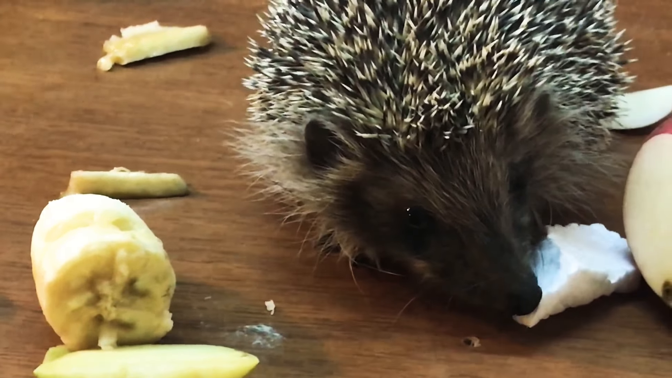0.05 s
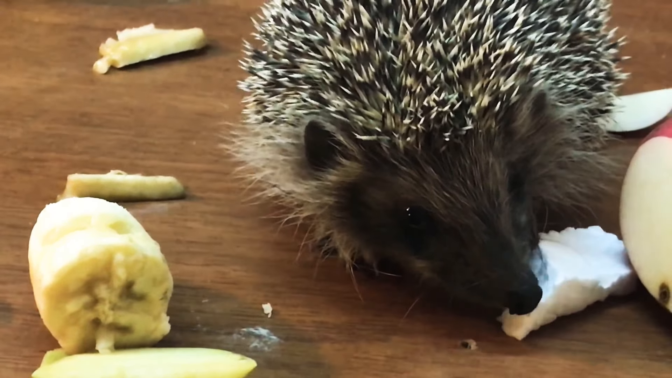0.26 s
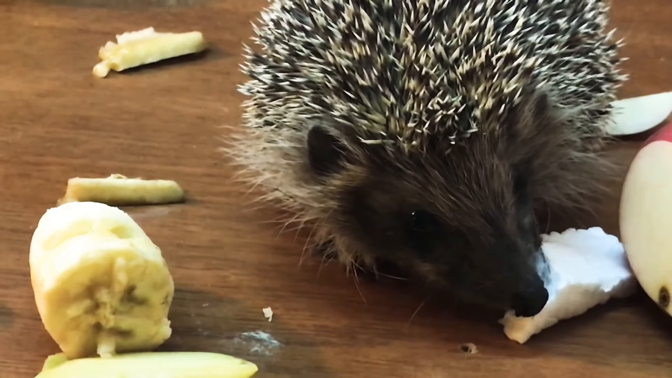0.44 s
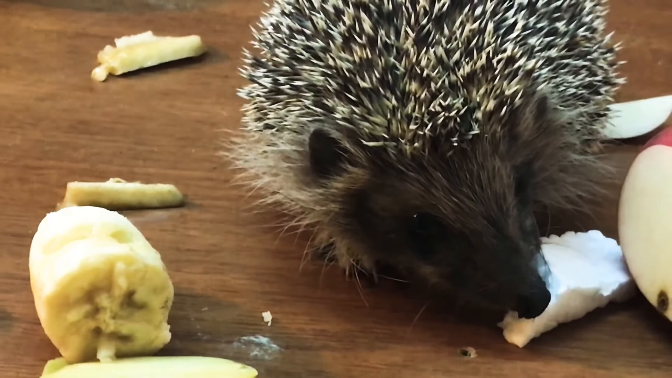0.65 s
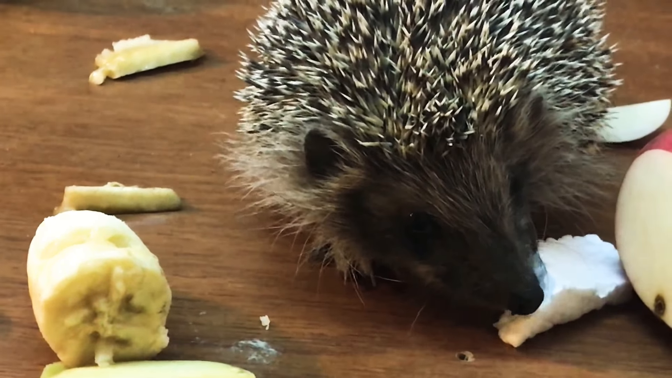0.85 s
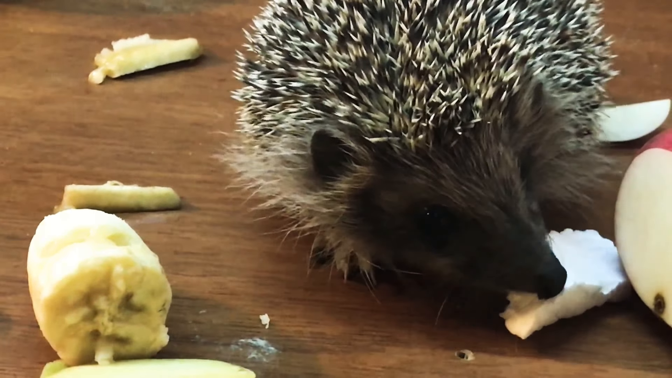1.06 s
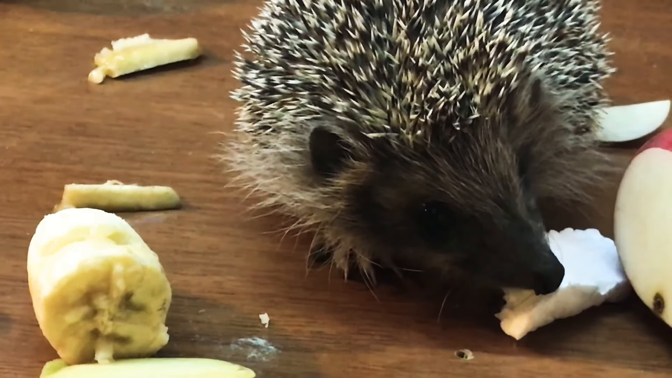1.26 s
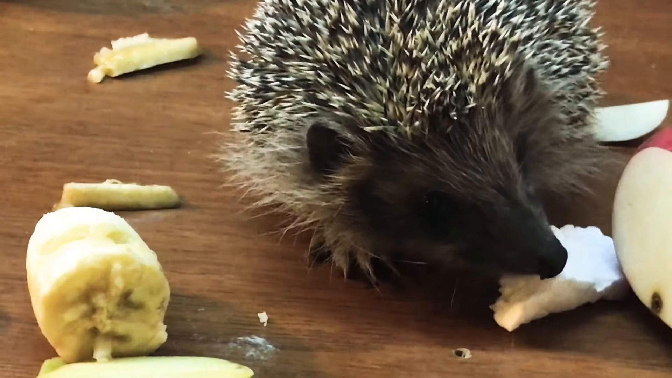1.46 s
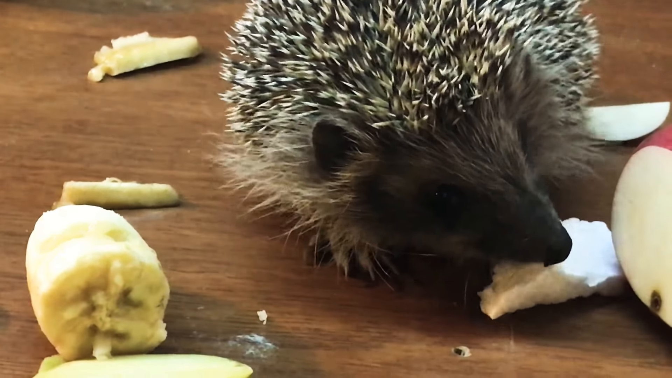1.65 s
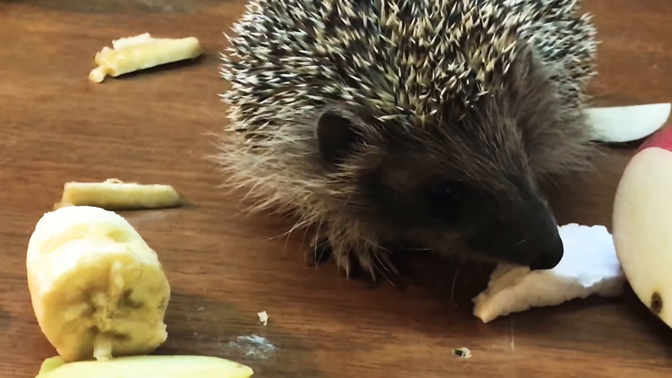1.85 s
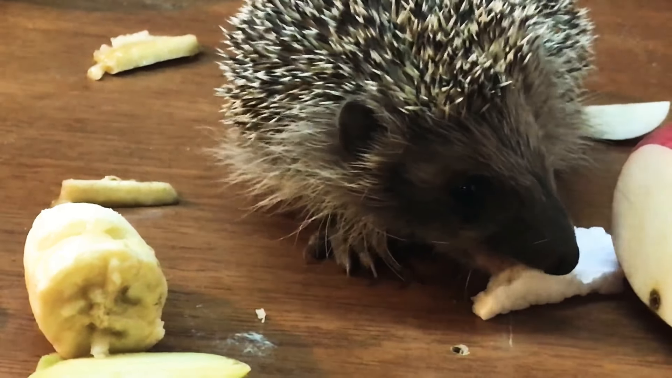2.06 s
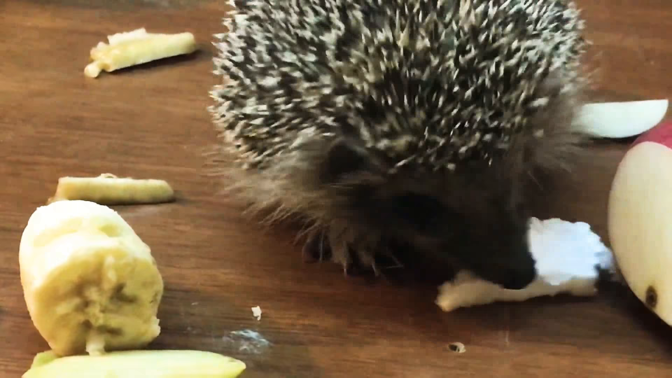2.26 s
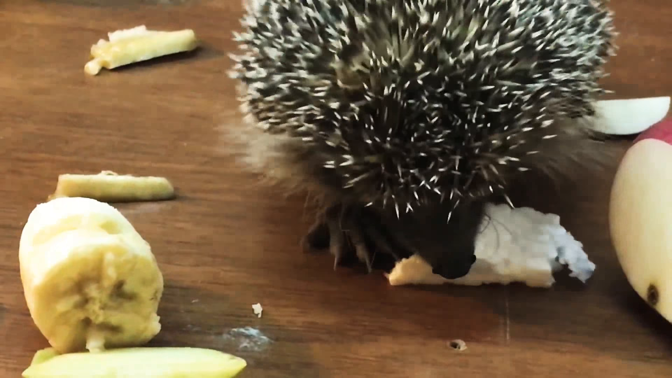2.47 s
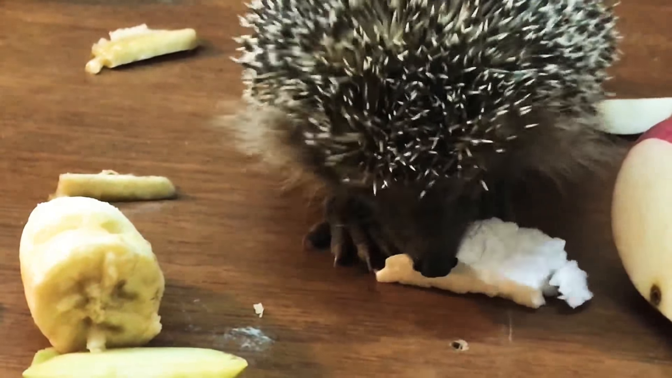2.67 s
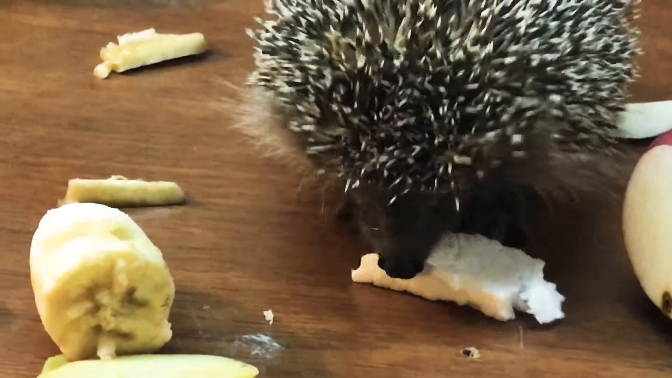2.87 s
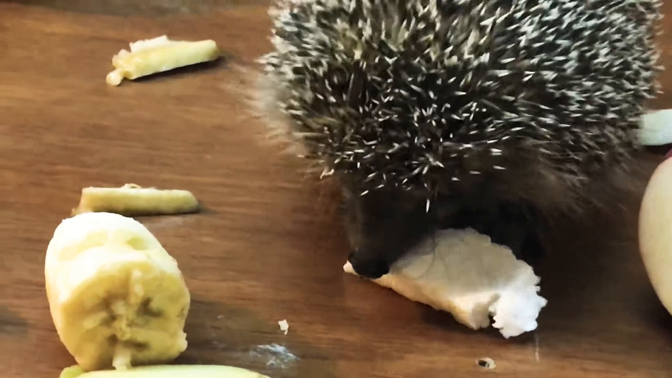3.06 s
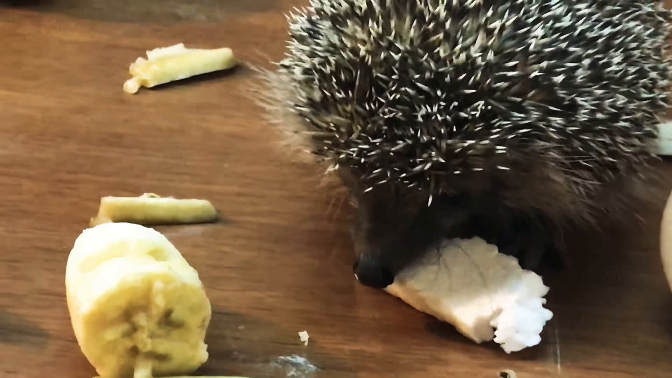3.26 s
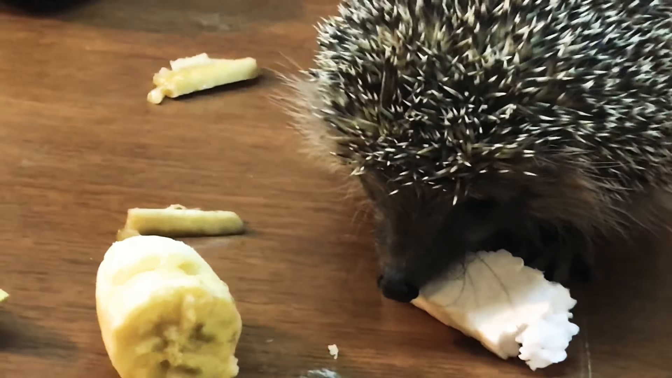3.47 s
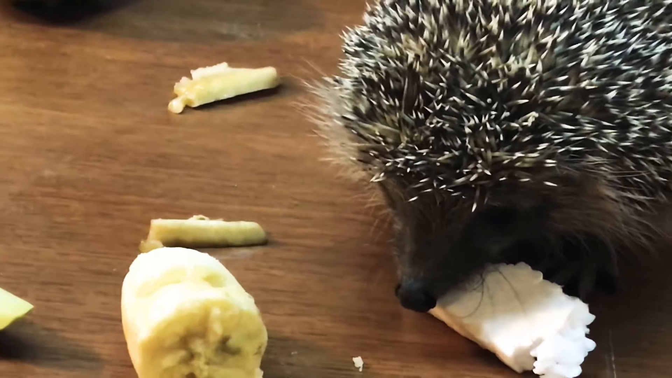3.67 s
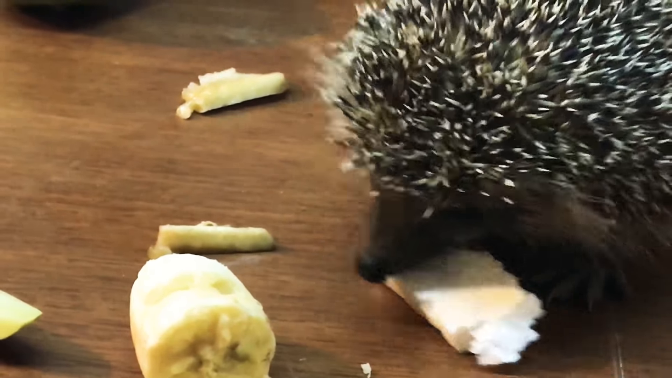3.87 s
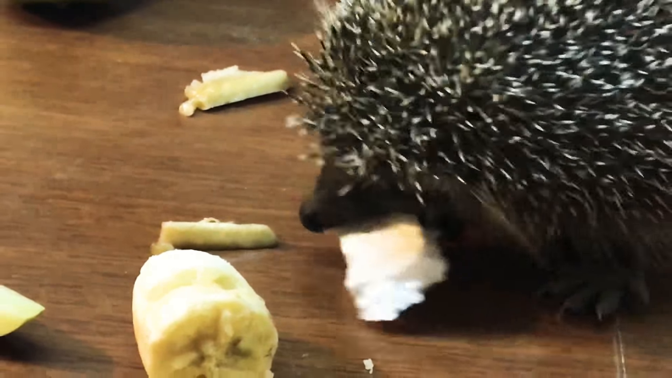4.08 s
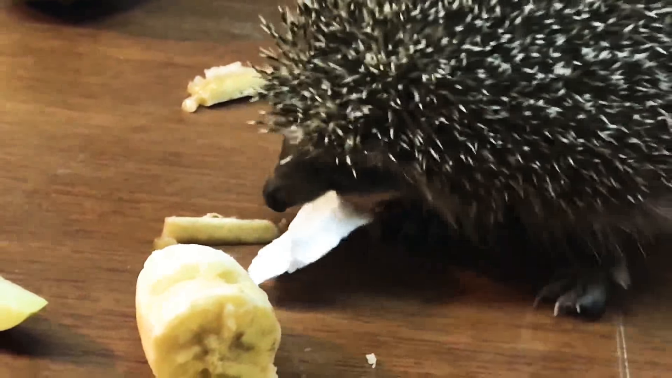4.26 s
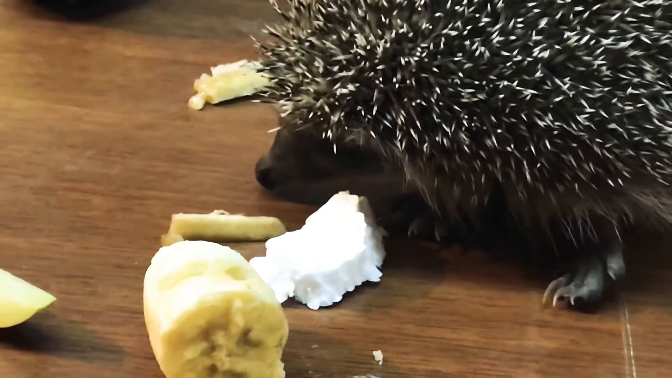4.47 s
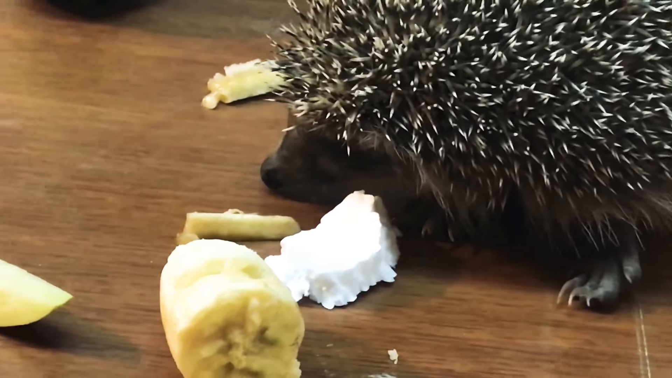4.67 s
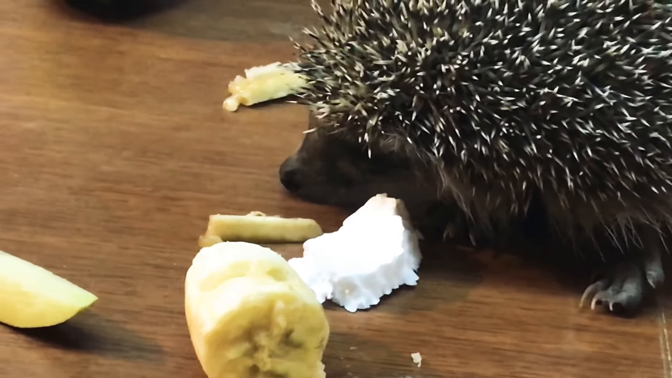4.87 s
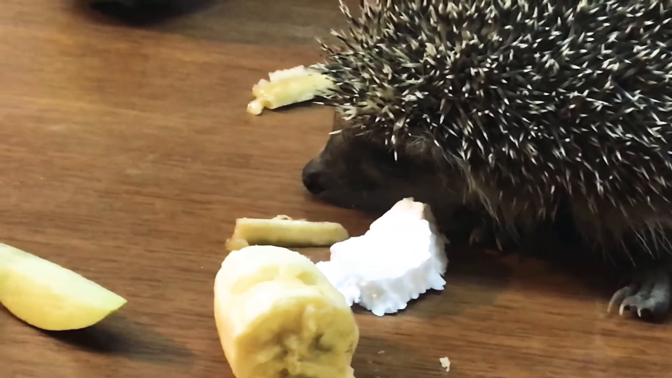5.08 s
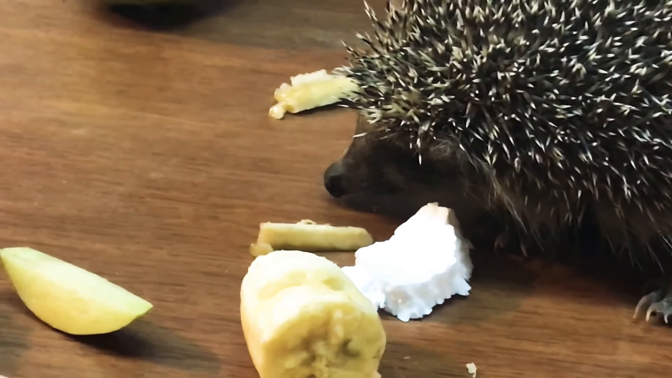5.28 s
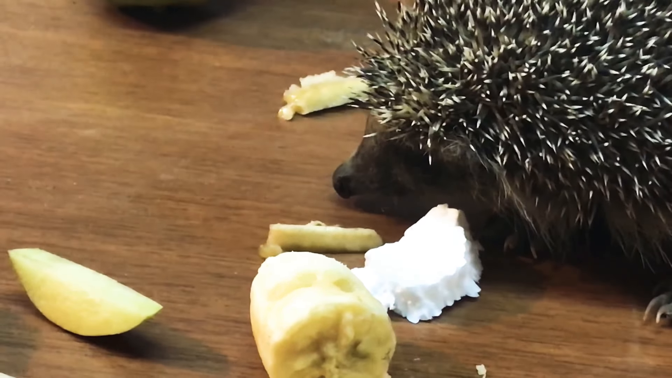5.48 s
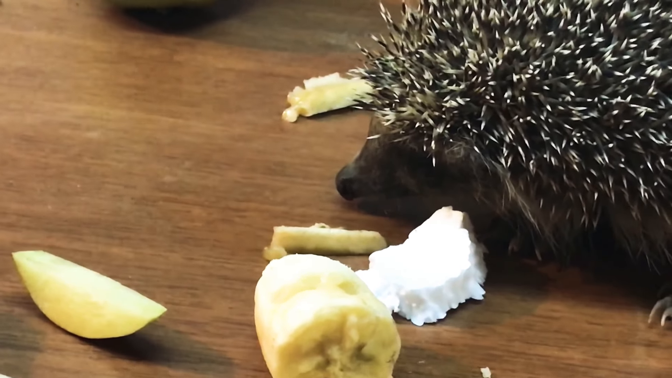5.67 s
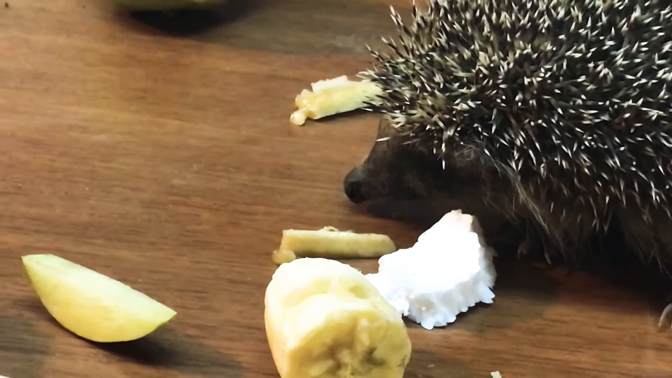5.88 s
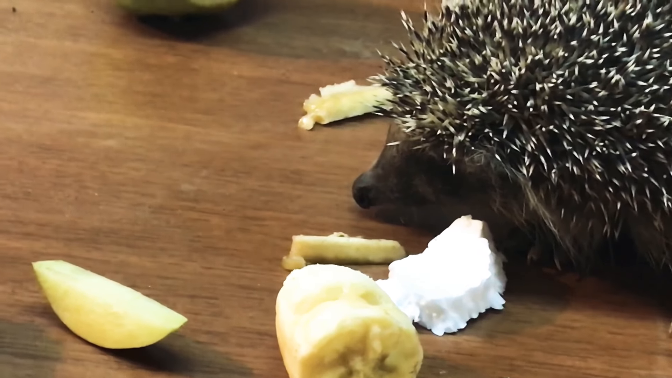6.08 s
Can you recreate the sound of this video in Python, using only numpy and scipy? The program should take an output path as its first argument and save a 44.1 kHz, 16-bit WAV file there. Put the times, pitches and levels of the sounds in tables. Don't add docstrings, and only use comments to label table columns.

```python
import sys
import numpy as np
from scipy import signal
from scipy.fft import rfft, irfft, next_fast_len
from scipy.io import wavfile
from scipy.ndimage import uniform_filter1d

SR = 44100
rng = np.random.default_rng(int(sys.argv[2]) if len(sys.argv) > 2 else 0)


def attenuation_scalar(level_db):
    decades = np.asarray(level_db, float) / 20
    return 10 ** decades


def to_wav(s):
    ch = np.atleast_2d(s).T
    pcm = np.round(np.clip(ch, -1, 1) * 32767)
    wavfile.write(sys.argv[1], SR, pcm.astype(np.int16))


N = 270333


def causal(hz, db):
    size = 8192
    f = np.maximum(np.arange(size // 2 + 1) * SR / size, 1)
    log_gain = np.interp(np.log(f), np.log(hz), db) * np.log(10) / 20
    cepstrum = irfft(log_gain)
    cepstrum[1:size // 2] *= 2
    cepstrum[size // 2 + 1:] = 0
    return irfft(np.exp(rfft(cepstrum)))


def shaped(x, hz, db):
    return signal.fftconvolve(x, causal(hz, db))[:N]


def walk(rate_hz):
    hold = int(SR / rate_hz)
    steps = np.repeat(rng.standard_normal(N // hold + 1), hold)
    return 1.3 * uniform_filter1d(uniform_filter1d(steps, hold), hold)[:N]


def bump(s, rise_ms, hold_ms, fall_ms):
    rise, hold, fall = np.maximum([rise_ms, hold_ms, fall_ms], 0.1) * SR / 1000
    first = max(int(s * SR - 6 * rise), 0)
    last = min(int(s * SR + hold + 6 * fall), N)
    i = np.arange(first, last)
    u = i - s * SR
    return i, np.exp(np.where(u < 0, u / rise, -np.maximum(u - hold, 0) / fall))


# hz, density_db_per_hz
ROOM_COLOUR = [(22, -27), (38, -5.5), (76, -10), (242, -14.5), (588, -21), (1000, -23.5), (4900, -32),
               (10000, -35), (14000, -35.5)]


def room():
    hiss = shaped(rng.standard_normal(N), *np.transpose(ROOM_COLOUR))
    low = signal.sosfilt(signal.butter(2, 400, fs=SR, output="sos"), hiss)
    drifting = hiss * attenuation_scalar(0.18 * walk(1.2)) + low * (attenuation_scalar(1.7 * walk(11)) - 1)
    return drifting * attenuation_scalar(-66.5) / np.std(hiss)


# time_s, level_db
FRIDGE_LEVEL = [
    (0.0, -60),
    (0.44, -56.5),
    (3.84, -56),
    (4.71, -58.5),
    (5.46, -53.5),
    (5.62, -59),
    (6.13, -55),
]


def fridge():
    t = np.arange(N) / SR
    turn = 2 * np.pi * 49.5 * t
    level = np.sqrt(2) * attenuation_scalar(np.interp(t, *np.transpose(FRIDGE_LEVEL)))
    return level * (np.sin(turn) + attenuation_scalar(-22.5) * np.sin(2 * turn))


# first_stroke_s, last_stroke_s
CRICKET_TRILLS = [(.007, 0.034), (0.08, .128), (.162, .228), (.277, .33), (.38, .398), (.511, .565),
                  (.657, .696), (0.759, .86), (.875, .927), (1.062, 1.13), (1.207, 1.26), (1.294, 1.426),
                  (1.477, 1.6), (1.795, 1.88), (1.908, 2.011), (3.428, 3.46), (3.51, 3.56), (3.695, 3.746),
                  (4.578, 4.665), (4.695, 4.797), (4.964, 5.046), (5.327, 5.412), (5.665, 5.697),
                  (5.728, 5.763), (5.843, 5.86), (5.897, 5.929), (6.044, 6.113)]


def cricket():
    stroke_s, stroke_db, chorus_db = 0.0172, -67.5, -85.0
    env = np.full(N, attenuation_scalar(chorus_db))
    for first_s, last_s in CRICKET_TRILLS:
        count = round((last_s - first_s) / stroke_s) + 1
        for s in np.linspace(first_s, last_s, num=count):
            i, stroke = bump(s - 0.002, 1.5, 1.5, 1.8)
            env[i] += attenuation_scalar(stroke_db) * stroke
    rasp = shaped(rng.standard_normal(N), [10970, 14100, 14790, 16140], [-39.0, -19.5, 1.5, -4.0])
    return env * attenuation_scalar(1.5 * walk(50)) * rasp / np.std(shaped(rasp, *np.transpose(MIC_PORT)))


POSTURE_CHANGE = [
    2.13,
    3.86,
]


def posture_now():
    return np.searchsorted(POSTURE_CHANGE, np.arange(N) / SR)


BOARD_RUMBLE = [
    -68,
    -53.5,
    -56.5,
]
# start_s, level_db, rise_ms, hold_ms, fall_ms
WEIGHT_SHIFTS = [
    (2.6, -69.5, 30, 98, 41),
    (4.74, -70, 22, 130, 60),
]


def board():
    load_ms = 70
    load = np.maximum(uniform_filter1d(sum(slips()), int(load_ms * SR / 1000)), 0)
    env = attenuation_scalar(np.array(BOARD_RUMBLE)[posture_now()]) * load ** 0.19
    for s, db, rise_ms, hold_ms, fall_ms in WEIGHT_SHIFTS:
        i, shift = bump(s, rise_ms, hold_ms, fall_ms)
        env[i] += attenuation_scalar(db) * shift
    rumble = shaped(rng.standard_normal(N), [80, 180, 350, 700, 1100], [-17.5, -5.0, -5.0, -7.5, -29.5])
    return env * attenuation_scalar(2.9 * walk(40)) * rumble / np.std(rumble)


# start_s, peak_db, pitch_hz, t60_s
PAW_STEPS = [(1.87, -54, 2500, 0.018), (1.87, -47, 4900, 0.0077), (1.87, -57, 6200, .007),
             (3.072, -53, 570, 0.044), (3.083, -51, 430, 0.05), (3.166, -48.5, 614, 0.026),
             (3.166, -38, 240, 0.018), (3.186, -47, 280, 0.034), (4.305, -52.5, 306, 0.054),
             (4.302, -54, 665, 0.032), (4.296, -53, 1440, .025), (4.298, -43.5, 2720, .018),
             (3.1, -47, 1800, .02), (2.98, -26.5, 4000, 0.0066), (2.253, -47, 660, .04),
             (2.244, -34.5, 2110, .024), (4.728, -50, 213, 0.2), (4.765, -53, 124, 0.32),
             (4.828, -50.5, 213, 0.15), (4.875, -53, 260, .06)]


def paws():
    push_cycles = 1.38
    out, t = np.zeros(N + SR), np.arange(SR // 4) / SR
    for s, db, hz, t60_s in PAW_STEPS:
        push = 1 - np.exp(-t * hz / push_cycles)
        decay = np.exp(-np.log(1000) * t / t60_s)
        start = int(s * SR)
        out[start:start + len(t)] += attenuation_scalar(db) * np.sin(2 * np.pi * hz * t) * decay * push
    return out[:N] * attenuation_scalar(3.47 * walk(200))


# start_s, peak_db, from_hz, to_hz, length_ms
BEND_CREAKS = [
    (2.187, -42, 1150, 1480, 14.8),
    (2.206, -43, 1250, 1620, 8.2),
    (2.208, -41, 2600, 3250, 13),
    (2.211, -48, 3700, 4700, 11),
]


def creaks():
    out = np.zeros(N)
    for s, db, from_hz, to_hz, ms in BEND_CREAKS:
        bend = np.linspace(0, 1, num=int(ms * SR / 1000)) ** 1.62
        hz = from_hz + (to_hz - from_hz) * bend
        tone = np.sqrt(np.hanning(len(hz))) * np.sin(2 * np.pi * np.cumsum(hz) / SR)
        start = int(s * SR)
        out[start:start + len(hz)] += attenuation_scalar(db) * tone
    return out * attenuation_scalar(1.4 * walk(400))


# start_s, level_db, length_ms, fine_crackle_db
WALL_TICKS = [(.062, -53.5, 1.1, -13), (.079, -64, 1.9, 1), (.129, -62, 2.4, -4), (.551, -57, 1.9, -2),
              (.622, -43, 1.6, -4), (1.043, -52.5, 0.92, -2), (1.352, -57, 1.7, 6), (1.498, -56.5, 3, 1),
              (1.747, -48, 1.3, 11), (1.805, -50, 0.82, 10), (1.835, -50, 0.79, 12), (2.569, -39, 1.1, -3),
              (2.401, -30, .8, -8), (2.558, -48, 1, -8), (2.629, -39.5, 1.1, -4), (2.657, -37, 1.2, -2),
              (2.833, -35.5, 1.1, -9), (2.853, -40, 1.2, -1), (2.931, -44, 1, -3), (2.947, -41, .8, 0),
              (2.973, -42, 1.5, 4.5), (3.067, -31, 1.8, 6.5), (3.291, -47, 2, -4), (3.596, -56, 1, -2),
              (3.603, -57, 1.2, 2), (3.611, -53, 1, -2), (3.618, -46, 0.96, 0), (3.691, -59.5, 1, 5),
              (3.708, -55, 1.1, -9), (3.719, -65.5, 1, 6), (3.79, -50, 1.2, 0), (3.845, -50, 1.2, -4),
              (3.853, -61, 1.5, -4), (4.239, -40, 1, 3), (3.481, -46.5, 1.8, -4), (.26, -43, 1.9, -5),
              (.535, -47, 1, -3), (2.112, -50, 1.1, -4), (3.5535, -47.5, 1.5, -2), (3.663, -43.5, 1, 0),
              (2.7855, -31.5, 1.02, 0), (3.748, -57, 1.5, 1), (3.758, -51.5, 1.2, -4),
              (4.518, -62, 1.6, -0.5), (4.692, -76, 1, 3), (4.705, -67, 2.7, -9.5), (5.249, -58.5, 1.2, 5),
              (5.583, -63.5, .9, 8), (5.772, -62, 1.8, -2)]
JAW_CLAMPS = [(2.168, -37, 1.2, -7), (2.571, -51, 9, 1), (3.46, -47.5, 0.86, -10), (2.188, -38.5, 10.4, -5),
              (2.208, -32, 10, -4), (2.242, -26.5, 4.9, -6), (2.2515, -28.5, 3.9, -4.5),
              (2.412, -32, 56, 0.5), (2.602, -38.5, 12, -2), (2.672, -41.5, 11, -4), (2.709, -39.5, 12, -5),
              (2.7225, -35.5, 3.5, -1), (2.763, -48, 7.2, 6), (2.852, -46, 32, -5), (3.571, -52, 5, 1),
              (.247, -52.5, 17, -10), (3.822, -59.5, 33, -1)]
FREE_JERKS = [(1.7, -54, 2, -9), (1.878, -60, 2, -2), (2.094, -54, 1, 0), (2.129, -51.5, 1, 2),
              (2.219, -31.5, 0.72, -4), (3, -39, 6, -2), (3.44, -66, 1, -8), (3.943, -34, 1, -4),
              (4.108, -45, 1, -9), (0.161, -65.5, 50, -19), (.338, -59, 15, -7), (0.46, -55, 35, -6),
              (1.362, -63, 8, -5), (1.5, -62, 17, -8), (1.808, -61, 30, 0), (1.3, -63, 3.2, -8),
              (1.912, -55, 8, -7), (2.137, -57.5, 85, -5), (2.242, -46, 230, -6), (2.269, -40, 10, -1),
              (2.997, -40, 8.2, 0), (4.241, -46, 13, 4), (3.611, -71, 37, 4), (3.684, -58, 2.5, -1),
              (3.905, -60, 49, 2), (3.468, -45, 2.1, -9), (3, -44, 2, -4), (3.578, -48, 1.5, -7),
              (1.275, -57, 2, 3), (2.5, -61, 1.5, 9), (.147, -62, 2, -8), (4.333, -45, 16, -4)]
PRESSURE_SWELLS = [(.535, -61, 8.4, -3), (.731, -66, 16, -16), (1.209, -61, 12, -8), (1.285, -68, 6, -2),
                   (1.45, -55, 7.3, -8), (1.536, -59, 11, -2), (1.62, -62.5, 36, -2), (1.723, -59, 7.9, -6),
                   (1.745, -63.5, 86, -4), (1.86, -60, 10, -2), (2.043, -56.5, 15, 0.5),
                   (2.125, -59.5, 48, -6), (2.177, -46, 23, -1), (2.22, -32, 3.7, -4), (2.468, -32, 20, 1),
                   (2.507, -47, 11, 5), (2.601, -43, 2.96, 0), (2.746, -46, 19, -3.5), (2.788, -39, 14, -3),
                   (2.806, -42.5, 45, -5), (2.832, -45, 6.9, 1), (2.956, -46, 61, -3),
                   (2.98, -42.5, 16, -9.5), (3.048, -43, 28, 0), (3.09, -54, 41, -1), (3.368, -59, 40, -6),
                   (3.639, -46, 9.1, -7), (3.651, -48, 4.8, -10), (4.238, -39, 26, -10)]
TOOTH_BITES = [(.326, -59, 3.5, 0), (.36, -61, 2.5, -11), (.855, -79, 4, -7), (.979, -57.5, 43, -3),
               (1.156, -55.5, 4.2, -6), (1.97, -68, 12, -1), (2.074, -58.5, 0.7, -5),
               (2.234, -40.5, 3, -2.5), (2.735, -48, 9.7, -5), (2.906, -47, 17, -4), (3.293, -58, 8.5, -7),
               (3.305, -50, 14.3, -9), (3.476, -57, 9.3, -9), (3.985, -41, 42, -7), (4.035, -41.5, 129, -8),
               (4.2, -45.5, 34, 6), (4.298, -39.5, 4.4, -5), (4.372, -67, 2, 3), (4.933, -73, 8.3, -5)]
BOARD_RUBS = [(3.0797, -28.5, .8, -3), (4.046, -40, 4, -4), (4.002, -38, 6, -5), (.292, -65, 18, -4),
              (.619, -66, 16, -2), (.655, -65, 9.2, 0), (.991, -50, 4.6, -8.5), (1.125, -58.5, 32, -5.5),
              (1.299, -71, 8, -2), (2.4, -35, 60, -1), (2.435, -25.5, 4.4, -1), (2.514, -34, 5, -6),
              (2.843, -46.5, 5.5, -2), (3.126, -43, 9.7, -4.5), (3.235, -46, 6.1, -5),
              (2.641, -41.5, 17, -2.5), (2.866, -40.5, 12.5, -6), (2.804, -47, 4, -6), (4.42, -58, 3.1, 2),
              (3.006, -36.5, 26.5, -4), (3.176, -51.5, 12, -5), (3.78, -53.5, 10, -5),
              (3.962, -36.5, 51, -1.5), (4.135, -37.5, 46, -3.5), (4.321, -45, 7.1, -6.5),
              (4.415, -48, 22, -1.5), (4.5, -64, 28, 1), (4.578, -73, 6.9, -6)]


def slips():
    kinds = [
        (WALL_TICKS, lambda ms: (0.24, 0, ms)),
        (JAW_CLAMPS, lambda ms: (0.93, ms, 3.2)),
        (FREE_JERKS, lambda ms: (0.93, 0, ms)),
        (PRESSURE_SWELLS, lambda ms: (ms, 0.12 * ms, 0.93 + 0.091 * ms)),
        (TOOTH_BITES, lambda ms: (4.2, ms, 0.93 + 0.41 * ms)),
        (BOARD_RUBS, lambda ms: (ms, 0.47 * ms, ms)),
    ]
    shell, fine = np.zeros(N), np.zeros(N)
    for rows, shape_ms in kinds:
        for s, db, ms, fine_db in rows:
            i, env = bump(s, *shape_ms(ms))
            power = (env * attenuation_scalar(db)) ** 2 / (1 + attenuation_scalar(fine_db) ** 2)
            shell[i] += power
            fine[i] += power * attenuation_scalar(fine_db) ** 2
    return shell, fine


# time_s, pressure_db
BOARD_PRESSURE = [(.3, -8), (1.0, 3), (1.3, -8.5), (2.2, 2.5), (2.36, 12.5), (2.47, 7), (2.66, 7),
                  (2.721, -7.5), (2.87, -1), (3.02, 17), (3.12, 0), (3.3, -1), (3.8, 4), (3.93, -6.5),
                  (4.2, -3), (4.3, 10), (4.37, 5), (4.55, 10)]
# faint rubbing between slips, level_db
REST_RUB = [
    -79,
    -77,
    -110,
]
# table-contact ring, level_db
CONTACT_RING = [
    -20,
    -17,
    -21,
]
# body ring, level_db
BODY_RING = [
    -12,
    -14.5,
    -16.5,
]
# upper over lower shell, ratio_db
UPPER_SHELL = [
    -11,
    -0.5,
    -5.5,
]


def force():
    posture = posture_now()
    rest = attenuation_scalar(np.array(REST_RUB)[posture] + 3.7 * walk(30))
    shell, fine = slips()
    shell = shell + rest ** 2
    fine = fine + (attenuation_scalar(-6.0) * rest) ** 2
    total = np.sqrt(shell + fine)
    press_db = np.interp(np.arange(N) / SR, *np.transpose(BOARD_PRESSURE))
    ring = total * attenuation_scalar(np.array(CONTACT_RING)[posture] + 0.076 * press_db)
    body = total * attenuation_scalar(np.array(BODY_RING)[posture] + 0.42 * press_db)
    upper = attenuation_scalar(np.array(UPPER_SHELL)[posture] - 0.28 * press_db)
    lower = np.sqrt(shell / (1 + upper ** 2))
    return ring, body, lower, lower * upper, np.sqrt(fine)


def cracks(per_second, spread_db):
    hit = rng.random(N) < per_second / SR
    size_db = spread_db * np.minimum(rng.exponential(size=N), 3)
    x = hit * rng.standard_normal(N) * attenuation_scalar(size_db)
    return x / np.std(x)


def face_response(colour, rings):
    grain_db = 1.8
    hz = np.geomspace(200, 20000, num=500)
    colour_hz, colour_db = np.transpose(colour)
    db = np.interp(np.log(hz), np.log(colour_hz), colour_db)
    db = db + grain_db * np.minimum(hz / 4500, 1) * rng.standard_normal(len(hz))
    for ring_hz, width_hz, ring_db in rings:
        db = db + ring_db / (1 + (2 * (hz - ring_hz) / width_hz) ** 2)
    return causal(hz, db)


FACE_FLIPS = [
    2.13,
    3.1,
]
# hz, density_db_per_hz
NIBBLE_FACE = [(410, -73), (700, -7), (2580, -18.5), (3910, -15.5), (4180, -10), (4700, -18), (6020, -5.5),
               (7510, -15), (8670, -4), (11900, -9), (15800, -9)]
TURN_FACE = [(500, -56), (850, -15.5), (2400, -15.5), (2620, -15), (4540, -12.5), (5190, -5.5), (5800, -3),
             (7140, -3.5), (10400, 0), (15800, -3)]
DRAG_FACE = [(410, -78), (700, -25), (1310, -34.5), (2350, -31.5), (3300, -15.5), (4640, -17), (5940, -4),
             (7810, -9), (9020, 5.5), (10700, -5), (15800, -5)]
# pitch_hz, width_hz, lift_db
NIBBLE_MODES = [(4200, 67, 1.5), (6000, 860, 3.1), (8600, 180, 2.7), (9700, 330, 2.5)]
TURN_MODES = [(1197, 99, 5.5), (1849, 190, 6.4), (3430, 460, 2.6), (5200, 300, 2.15), (6900, 480, 7.3),
              (9200, 810, -0.5)]
DRAG_MODES = [(1304, 220, 13), (2870, 2100, 5), (4470, 1600, 3), (5660, 650, 3), (7100, 320, 4.5),
              (9260, 930, -4)]


def chunk():
    size = next_fast_len(N + SR // 10)
    f = np.arange(size // 2 + 1) * SR / size
    centres_hz = np.array([1000, 1400, 2000, 3000, 4000, 5300, 6300, 7400, 8700, 10500, 12300, 14500])
    region = np.searchsorted([2500, 4800, 7900, 10000], centres_hz)
    onset = np.clip((f - 700) / 350, 0, 1)
    share = [np.interp(f, centres_hz, row) * onset for row in np.eye(len(centres_hz))]
    drive = force()
    excite = cracks(20000, spread_db=0.86) * attenuation_scalar(0.49 * walk(220))
    groups = [drive[r] * excite * attenuation_scalar(1.1 * walk(40) + 2.2 * walk(160)) for r in region]
    face = np.searchsorted(FACE_FLIPS, np.arange(N) / SR)
    faces = [(NIBBLE_FACE, NIBBLE_MODES), (TURN_FACE, TURN_MODES), (DRAG_FACE, DRAG_MODES)]
    out = 0
    for k, (colour, rings) in enumerate(faces):
        response = rfft(face_response(colour, rings), size)
        for r in range(len(drive)):
            members = np.nonzero(region == r)[0]
            whole = response * sum(share[m] for m in members) * (f < 14300)
            unit = response / np.sqrt(np.mean(np.abs(whole) ** 2))
            out = out + unit * sum(share[m] * rfft(groups[m] * (face == k), size) for m in members)
    return irfft(out, size)[:N]


# start_s, length_ms, pitch_hz, width_hz, gain_db
TOOTH_PATCHES = [(2.16, 25, 2200, 2500, -2.5), (.24, 30, 1300, 1000, -11), (2.205, 20, 3800, 700, -5),
                 (2.238, 16, 5840, 900, 6.5), (2.238, 17, 3300, 1500, -3), (2.27, 140, 6500, 600, 1.5),
                 (2.29, 170, 1700, 1308, -3), (2.32, 130, 3600, 600, 1.5), (2.42, 33, 5100, 500, 8),
                 (2.44, 21, 7300, 600, 8), (2.46, 18, 2980, 2500, 1.5), (2.505, 16, 7250, 500, 5),
                 (2.505, 16, 2280, 2200, -6), (2.597, 19, 9800, 1200, 5.5), (2.597, 26, 3000, 1800, -9),
                 (3.1, 55, 5600, 1500, -1.5), (2.635, 43, 3800, 1500, -2), (2.67, 18, 9700, 600, 4.5),
                 (2.705, 23, 9600, 1400, 7), (2.76, 40, 9200, 1200, 5.5), (2.775, 25, 5200, 400, 6),
                 (3.6, 200, 6900, 1200, -7), (2.85, 23, 9500, 1000, 6.5), (2.851, 30, 7060, 1500, -5),
                 (2.9, 40, 8900, 1000, 6.5), (2.99, 12, 7200, 900, 3), (3.015, 25, 5470, 1500, 3),
                 (2.9, 75, 14500, 2500, 9), (3.115, 23, 8450, 1600, 8.5), (3.45, 45, 4000, 800, 3.5),
                 (3.625, 32, 5600, 400, 1), (3.76, 99, 9300, 1200, 5), (3.91, 83, 6700, 1200, 8),
                 (3.91, 73, 8600, 1500, -1), (4.16, 290, 7260, 1200, 0.5), (4.19, 35, 8540, 600, 5.5),
                 (4.2, 42, 2700, 500, 9), (4.292, 14, 8400, 700, 5), (4.255, 120, 1800, 1500, 8),
                 (4.41, 32, 14800, 1500, 5)]
# start_s, length_ms, pitch_hz, width_hz, gain_db
MORE_PATCHES = [(.95, 240, 4540, 1500, -1), (2.28, 120, 4700, 900, -3.5), (2.29, 45, 10000, 4000, -4),
                (2.34, 82, 6600, 700, 5), (2.375, 45, 1690, 1500, -5), (2.455, 19, 1400, 1200, -7.5),
                (2.43, 11, 5100, 400, 3.5), (2.62, 17, 2400, 1800, 7), (2.77, 70, 4200, 1100, -2.5),
                (2.95, 30, 7000, 600, -4.5), (3.0, 22, 7000, 600, -10), (3.04, 25, 3000, 3000, -0.5),
                (3.215, 62, 7860, 2500, 8), (3.47, 22, 5650, 350, -1), (3.57, 12, 5650, 400, 6),
                (3.615, 30, 9000, 1800, 1), (3.9, 340, 5130, 450, -4.5), (3.95, 230, 5900, 350, 4),
                (4.02, 160, 3200, 350, 5.5), (4.04, 200, 4130, 700, -2), (3.95, 60, 1990, 700, -4),
                (4.0, 50, 1300, 300, -2), (4.12, 88, 1330, 250, 5), (4.0, 260, 15000, 2000, -2.5),
                (4.315, 42, 3560, 2000, -11), (4.39, 39, 5700, 600, 4)]


def patches(x):
    fade_ms = 2
    out = x.copy()
    for s, ms, hz, width_hz, db in list(TOOTH_PATCHES) + list(MORE_PATCHES):
        i, grip = bump(s, fade_ms, ms, fade_ms)
        band = signal.lfilter(*signal.iirpeak(hz, hz / width_hz, fs=SR), x[i])
        out[i] += (attenuation_scalar(db) - 1) * grip * band
    return out


def table_echo(x, wet_db, t60_s):
    t = np.arange(int(0.25 * SR)) / SR
    tail = rng.standard_normal(len(t)) * np.exp(-np.log(1000) * t / t60_s) * (t > 0.002)
    tail = tail / np.sqrt(np.sum(tail ** 2))
    return x + attenuation_scalar(wet_db) * signal.fftconvolve(x, tail)[:N]


def scene():
    food = attenuation_scalar(-1.5) * patches(chunk()) + creaks()
    mono = room() + fridge() + cricket() + board() + paws()
    mono = mono + table_echo(food, wet_db=-22.0, t60_s=0.18)
    return np.array([mono, mono])


def band_limit(x):
    return signal.sosfilt(signal.butter(12, 16000, fs=SR, output="sos"), x)


# hz, gain_db
MIC_PORT = [(9600, -1), (10400, -3), (11300, -0.5), (15780, 4.5), (15900, -63)]


def record(dry):
    heard = np.array([shaped(x, *np.transpose(MIC_PORT)) for x in dry])
    return band_limit(heard)


dry = scene()
out = record(dry)
to_wav(out)
```